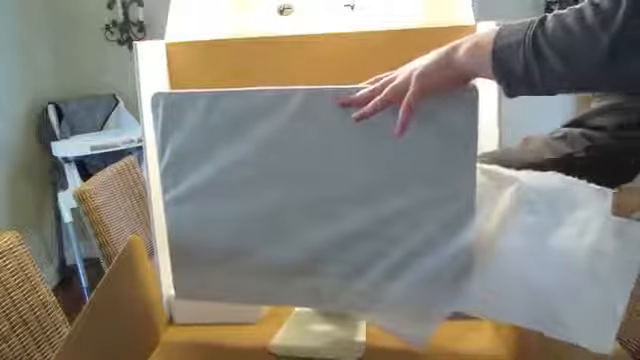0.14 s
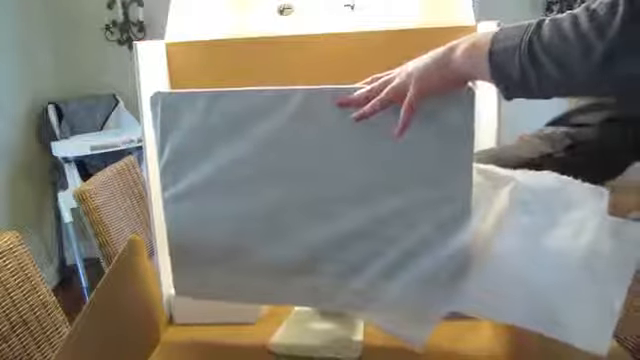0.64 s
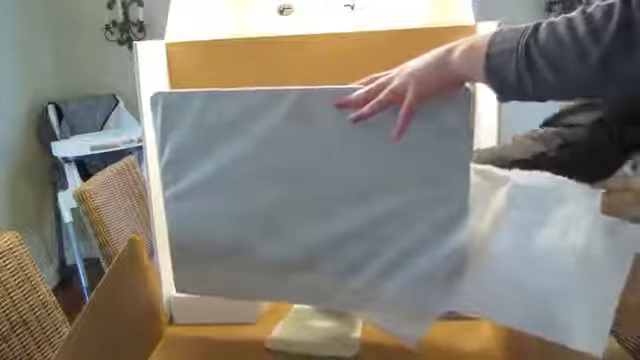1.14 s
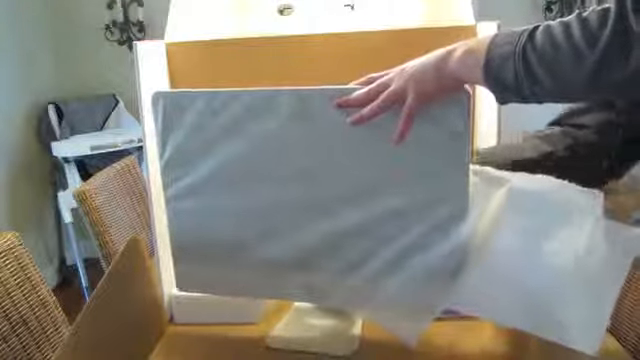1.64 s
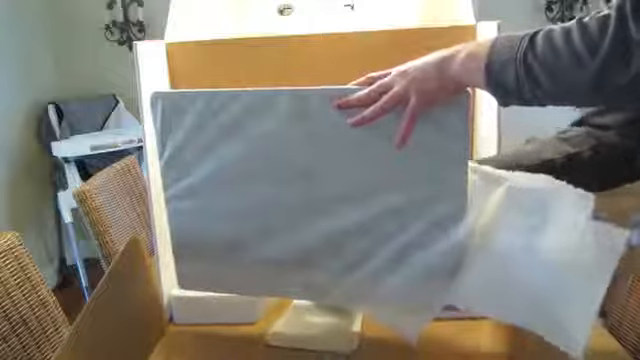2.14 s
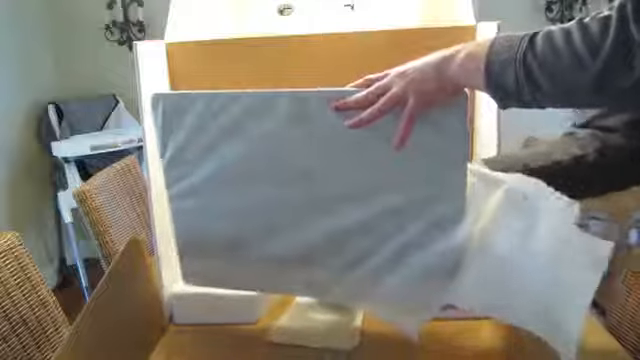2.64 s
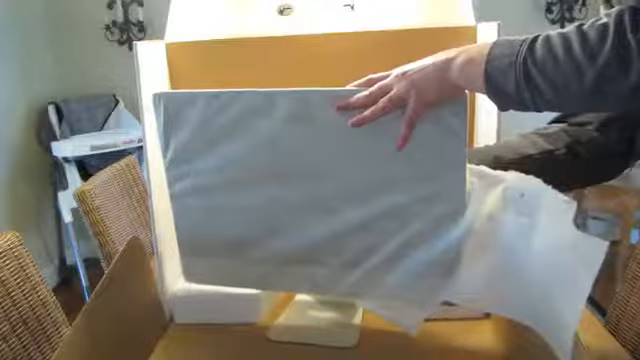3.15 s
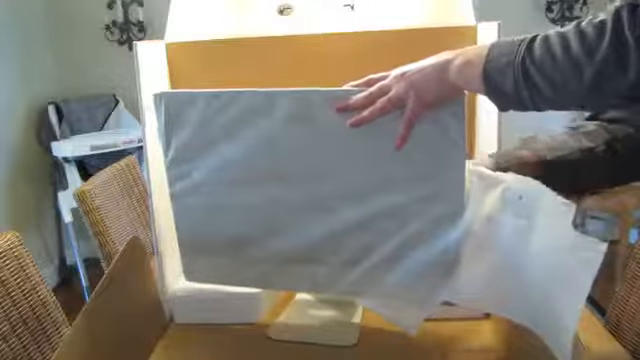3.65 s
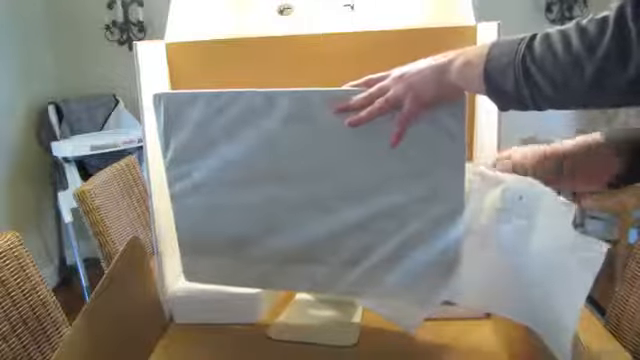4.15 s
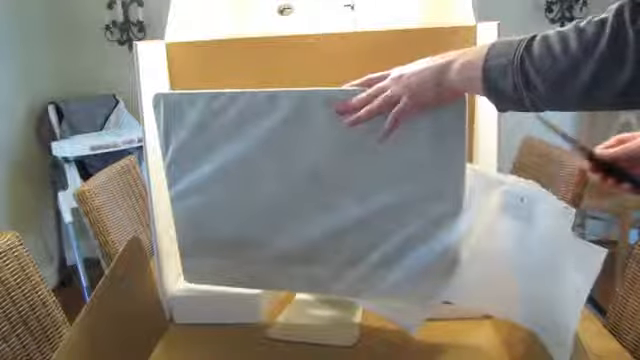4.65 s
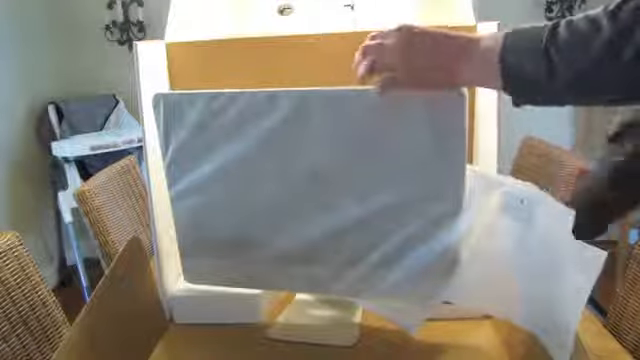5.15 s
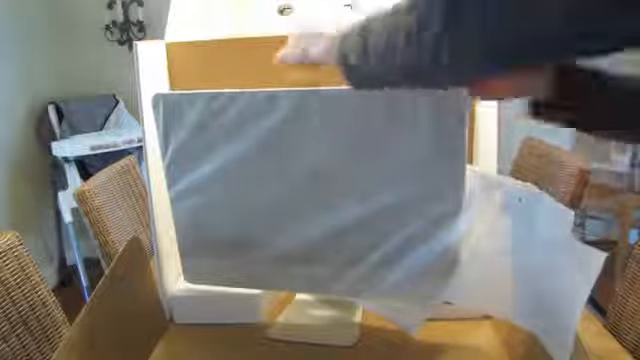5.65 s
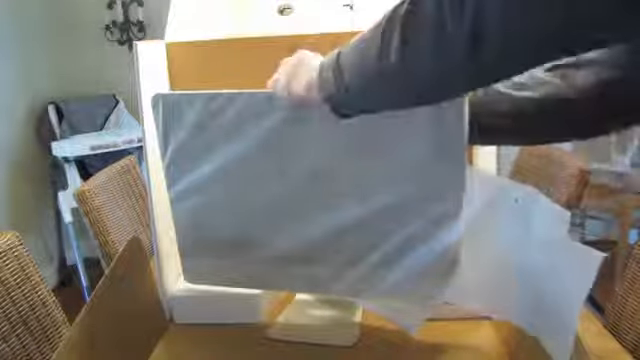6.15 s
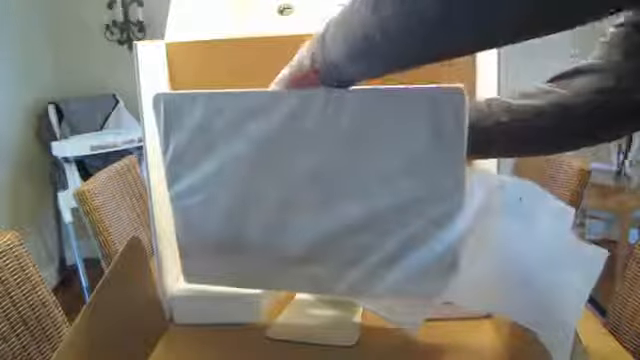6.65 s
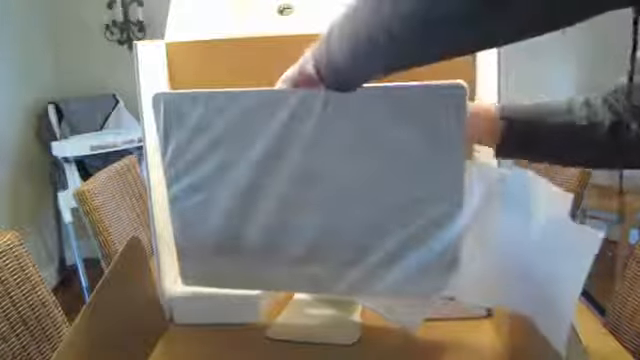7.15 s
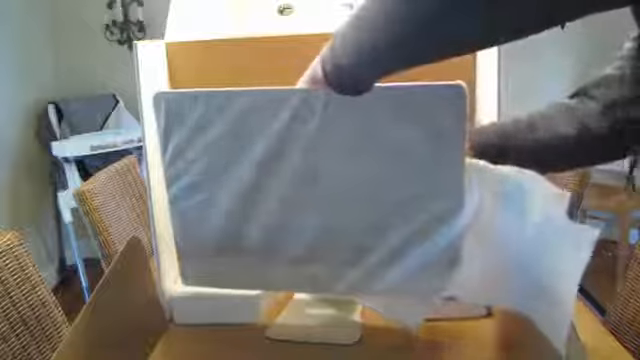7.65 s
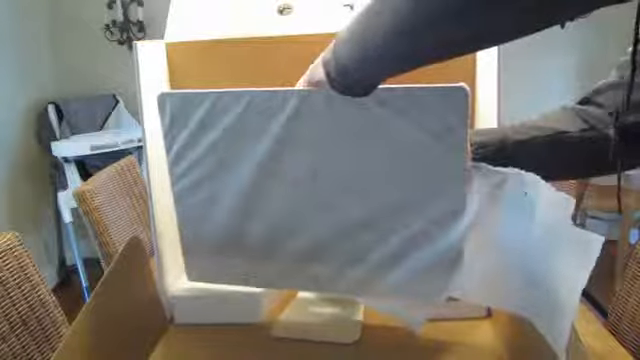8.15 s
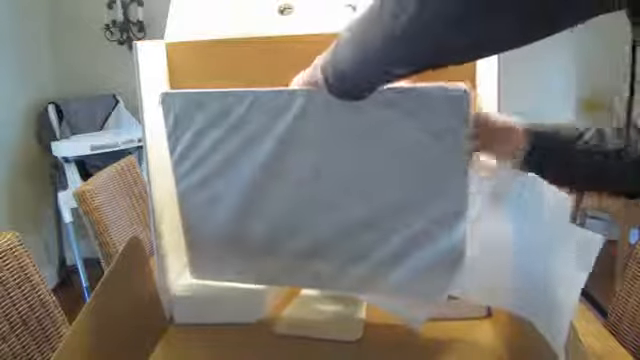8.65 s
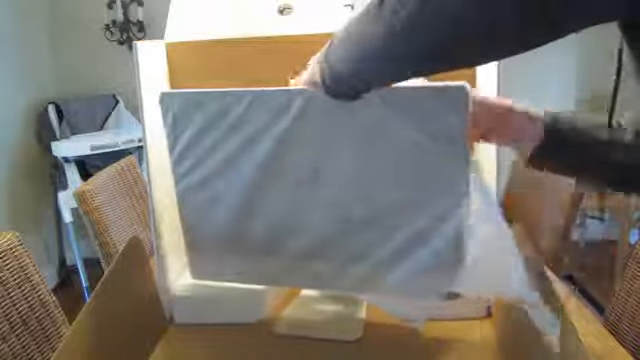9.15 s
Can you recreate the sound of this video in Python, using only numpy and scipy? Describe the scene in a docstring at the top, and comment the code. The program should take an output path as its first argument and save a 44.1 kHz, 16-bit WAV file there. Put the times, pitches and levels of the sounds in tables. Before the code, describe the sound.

A close small microphone in a modest living room hears thin foam and plastic sheeting dragged off a large panel. From 0 to 0.6 seconds, strong crackling tugs and sharp pops drum the panel underneath. Softer crinkles and isolated snaps follow, with brighter clusters around 1.7, 2.1 and 2.6, and a dense loud one at 3.5 to 3.7. From 3.8 to 4.45 a continuous rustling slide tightens and rises, with a faint thin squeak, ending in a pop. Near quiet follows. At 5.2 and 5.4 a foam block is knocked and shoved, dull then brighter and hollow. Faint rustles continue until snaps at 6.9 and 7.1, then light handling and a small pop at 7.9. From 8.4 to 8.9 loud snaps, crackles and panel thumps crowd together, fading by 9.3. Short room echoes, faint air hush and low table rumble lie beneath.

```python
"""Uncovering a large flat panel

Hands tug a thin foam and plastic cover off a large flat panel on a table in a living room.
Stick-slip friction makes the sheet crackle in strokes and drums the panel's low modes; creases snap
as clicks with short rattles; a foam block is knocked and shoved twice, ringing its own modes.
The room answers with echoes and a decaying tail; still air and the shaking table lie beneath,
and a small microphone dulls the treble."""
import sys
import numpy as np
from scipy import signal
from scipy.fft import rfft, irfft, next_fast_len
from scipy.io import wavfile
from scipy.ndimage import uniform_filter1d

SR = 44100
rng = np.random.default_rng(int(sys.argv[2]) if len(sys.argv) > 2 else 0)


def volts_from_db(level):
    """Convert decibel levels to linear amplitude ratios."""
    exponent = np.asarray(level, float) / 20
    return 10 ** exponent


def put_to_file(sound):
    """Save the sound as 16-bit audio at rate SR, in the file named by the first command-line argument."""
    columns = np.atleast_2d(sound).T  # one column per channel
    safe = np.clip(columns, -1, 1)
    whole_steps = np.round(safe * 32767)
    wavfile.write(sys.argv[1], SR, whole_steps.astype(np.int16))


N = 409688  # samples, 9.29 s


def evened(x):
    """Normalisation: scales a signal to rms 1."""
    return x / np.sqrt(np.mean(x ** 2) + 1e-20)


def read(points, hz):
    """Logarithmic pitch axis: interpolates a spectrum table over log frequency."""
    f, value = np.transpose(points)
    return np.interp(np.log(hz + 1), np.log(f + 1), value)


def curves(rows):
    """Piecewise-linear control: joins each column by straight lines, one value a sample."""
    s, *columns = np.transpose(rows)
    return [np.interp(np.arange(N) / SR, s, c) for c in columns]


def add(mix, s, sound):
    """Superposition: adds a sound into the mix at time s."""
    part = mix[round(s * SR):][:len(sound)]
    part += sound[:len(part)]


def coloured(x, points):
    """Linear filtering: weights the spectrum by a table, then scales to rms 1."""
    size = next_fast_len(len(x))
    gain = volts_from_db(read(points, np.fft.rfftfreq(size, 1 / SR)))
    return evened(irfft(rfft(x, size) * gain, size)[:len(x)])


def resonate(x, hz, width):
    """Heterodyne resonance: shifts hz down to zero, smooths and shifts back, with peak gain 1."""
    turn = np.exp(2j * np.pi * np.cumsum(hz * np.ones(len(x))) / SR)
    r = np.exp(-np.pi * abs(width) / SR)
    return 2 * (turn * signal.lfilter([1 - r], [1, -r], x / turn + 1e-18)).real


def slips(per_s, spread_db, clump_db):
    """Stick-slip friction: random tiny clicks of uneven size whose strength swells in clumps."""
    chance, size = rng.random(N), rng.exponential(1, N)
    sign, clump = rng.standard_normal(N), rng.standard_normal(N)
    clump = evened(uniform_filter1d(uniform_filter1d(clump, size=300), size=300))
    size_db = spread_db * np.minimum(size, 3.2) + clump_db * clump
    return evened((chance < per_s / SR) * sign * volts_from_db(size_db))


# Spectrum of the still air: (frequency [Hz], relative density [dB per Hz])
AIR_SPECTRUM = [(76, -35), (130, 3), (630, -5), (880, -6), (1600, -15), (1900, -9.5), (3800, -29),
                (7000, -26), (10000, -44), (14000, -37)]


def still_air():
    """Broadband noise: dense random clicks shaped into the hush of still room air."""
    return volts_from_db(-55) * coloured(slips(per_s=20000, spread_db=2.0, clump_db=2.0), AIR_SPECTRUM)


# Table and floor shaking the microphone:
# (time [s], slow sway level [dB], faster judder level before its trim [dB])
TABLE_SHAKE = [(0.0, -50, -66), (0.41, -38, -66), (0.93, -45, -54), (1.78, -42, -66), (1.81, -42, -56),
               (3.44, -45.5, -67), (4.17, -56.5, -67), (5.17, -50, -63), (5.22, -43, -60), (5.67, -46, -65),
               (6.6, -51.5, -60), (6.93, -34, -51), (7.06, -34, -60), (7.16, -47, -63), (7.35, -34.5, -56),
               (7.48, -44.5, -61), (7.99, -40, -54), (8.31, -47, -61), (8.57, -30, -50), (8.74, -33, -59),
               (8.87, -47, -44), (8.93, -32, -40), (9.0, -40, -58), (9.29, -53, -57)]
JUDDER_TRIM_DB = -1.5
JOLT_DB = -20  # share of the panel's drumming that reaches the table as judder


def table_shaking():
    """Structure-borne vibration: low noise sways the microphone and tugs on the panel jolt it."""
    sway_db, judder_db = curves(TABLE_SHAKE)
    # spectra: (frequency [Hz], relative density [dB per Hz])
    sway = coloured(rng.standard_normal(N), [(8, -12.5), (22, 7.0), (50, -9.5), (62, -13), (90, -57.5)])
    judder = coloured(rng.standard_normal(N), [(45, -26), (65, -7.5), (130, 3.5), (160, -5.5), (220, -25)])
    drag_db, _, drum_db, *_ = tugging()
    jolts = volts_from_db(judder_db + JUDDER_TRIM_DB) + volts_from_db(drag_db + drum_db + JOLT_DB)
    return volts_from_db(sway_db) * sway + jolts * judder


# Reverberation of the room: (frequency [Hz], time to decay by 60 dB [s])
REVERBERATION = [(120, 0.12), (330, 0.65), (870, 0.51), (2300, 0.34), (6060, 0.23)]


def room(x):
    """Reverberation: near echoes off table and panel, then sparse taps dying band by band."""
    out = np.zeros(N)
    # three answers fade in and out against each other: the paths shift as the hands move
    turn = 2 * np.pi * 4.75 * np.arange(N) / SR
    for k in range(3):
        taps = np.zeros(SR)
        at = np.arange(200, SR - 20, 20)
        taps[at + rng.integers(0, 20, len(at))] = rng.choice([-1., 1.], len(at))
        hz, t, z = signal.stft(taps, SR, nperseg=256)
        decay = volts_from_db(-60 * t / read(REVERBERATION, hz)[:, None])
        tail = signal.istft(z * decay, SR, nperseg=256)[1]
        tail = volts_from_db(-7.0) * tail / np.linalg.norm(tail)
        # echoes: (mean delay [s], level [dB])
        for s, db in [(.0021, -9), (.0047, -10), (.0088, -13), (.0135, -18)]:
            add(tail, s * rng.uniform(.7, 1.3), np.array([volts_from_db(db)]))
        sent = x * np.sqrt(2 / 3) * np.cos(turn + k * np.pi / 3)
        out += signal.fftconvolve(sent, tail)[:N]
    return out


# Modes of the foam block: (frequency [Hz], width [Hz], level before tilt [dB])
BLOCK_MODES = [(140, 100, -15), (267, 64, -9), (353, 38, 1), (468, 43, 0), (550, 175, -5.5), (723, 40, 5.5),
               (932, 52, 0.5), (1205, 130, -6.5), (1430, 59, -7), (1800, 150, -13.5), (2130, 110, -18),
               (2620, 710, -29.5)]
# Two shoves, one list each: (time [s], level before the trim [dB], tilt about 600 Hz [dB per octave])
BLOCK_SHOVES = [
    [(5.221, -25, -4), (5.229, -19.5, -4), (5.354, -36, -6.5)],
    [(5.357, -23.5, 3), (5.379, -17, 2.3), (5.555, -44, -3.5), (5.62, -61, 3)],
]
KNOCK_DB = 18  # first contact of each shove, above the rms of the slips
BLOCK_TRIM_DB = -4.5


def foam_block():
    """Modal excitation: a knock and coarse slips in each shove ring the modes of a foam block."""
    first, second = BLOCK_SHOVES
    level_db, tilt_db = curves(first + second)
    t = np.arange(N) / SR
    moving = (t > first[0][0]) & (t < second[-1][0])
    grains = slips(per_s=1800, spread_db=2.0, clump_db=0.9)
    for rows in BLOCK_SHOVES:
        add(grains, rows[0][0] + .001, np.array([volts_from_db(KNOCK_DB)]))
    shove = np.convolve(grains, np.hanning(17), "same")  # soft foam rounds each slip and dulls the top
    rung = np.zeros(N)
    for k, (hz, width, db) in enumerate(BLOCK_MODES):
        gain = (-1) ** k * volts_from_db(db + tilt_db * np.log2(hz / 600))
        rung += gain * resonate(shove, hz, width)
    rms = np.sqrt(np.mean(rung[moving] ** 2))
    return moving * volts_from_db(level_db + BLOCK_TRIM_DB) * rung / rms


# Spectrum of the sheet's body: (frequency [Hz], relative density [dB per Hz])
SHEET_SPECTRUM = [(180, -43), (300, -12), (592, -11), (1010, 4), (1100, -1), (1430, 1), (2500, 1.5),
                  (2830, 0), (4500, -16.5), (5850, -22.5), (9900, -120)]


def sheet_body(clicks):
    """Radiation of a thin sheet: clicks take on its broad spectrum, at rms 1."""
    return coloured(clicks, SHEET_SPECTRUM)


# Spectrum of the fine crackle: (frequency [Hz], relative density [dB per Hz])
CRACKLE_SPECTRUM = [(1800, -20), (3000, -10.5), (3800, -8), (5300, -5), (7500, -8), (8700, -13),
                    (10000, -18), (14000, -18.5)]


def fine_crackle(clicks):
    """Small-fold radiation: clicks take on a bright spectrum, at rms 1."""
    return coloured(clicks, CRACKLE_SPECTRUM)


# How the steadying hand loads the panel: (time [s], tilt of its modes about 240 Hz [dB per octave])
HAND_GRIP = [(0, -5.5), (1, 3.5), (2.2, -5.5), (3.6, -4.5), (4.2, 6), (5.7, 4.5), (6.8, -5), (7.3, 5.5),
             (8.4, 5), (9.29, 7.5)]


def grip_tilt():
    """Loading of a plate: the hand's grip tilts the balance of the panel's modes."""
    return curves(HAND_GRIP)[0]


# Modes of the panel: (frequency [Hz], nominal width [Hz], level before tilt [dB])
PANEL_MODES = [(178.5, 42, -2.5), (230, 55, 7), (326.5, 75, 3), (404, 143, -3.5), (614, 298, -7)]


def panel(force, tilt_db):
    """Modal sum: a force rings steep resonances of alternating sign."""
    out = 0
    for k, (hz, width, db) in enumerate(PANEL_MODES):
        gain = (-1) ** k * volts_from_db(db + tilt_db * np.log2(hz / 240))
        # each of two passes is widened, since passing twice narrows the peak
        once = resonate(force, hz, 1.48 * width)
        out = out + gain * resonate(once, hz, 1.48 * width)
    return out


# Creases that snap, and at 5.224 s the sharp tick of the foam block's first knock: (time [s], level before the
# trim [dB], pitch of the pop [Hz], # thump relative to the pop, before its trim [dB], crack relative to the
# pop, before its boost [dB])
SNAPS = [(0.028, -27, 2460, -1, -18), (0.052, -6, 2550, -15.5, -13), (0.216, -24, 2620, -3, 1),
         (0.236, -5.5, 710, -5, -15), (0.253, -10, 1120, -8.5, -18), (0.272, -13, 2600, -4, -18),
         (0.444, -17, 1750, -11, -4), (0.485, -11.5, 3040, -13, -17), (0.97, -22, 1000, -14, -27),
         (1.165, -19.5, 840, 3, -3.5), (1.346, -16.5, 2400, -31, -28), (1.37, -17, 2300, -25, -25),
         (1.533, -28.5, 1290, 5.5, -3), (1.725, -10, 1940, -35, -15), (1.746, -7.5, 2400, -23, -29),
         (1.817, -12, 2710, -28, -9.5), (1.942, -22.5, 2800, -8, -9), (2.135, -2.5, 2260, -31, -24),
         (2.155, -5, 2320, -29, -36), (2.17, -9, 2190, -33, -31), (2.428, -19, 1290, -2, -10),
         (2.578, -10.5, 1640, -16, -37), (2.617, -7, 2410, -36, -19), (2.947, -15, 2290, -5.5, -15),
         (3.114, -22.5, 985, -7, -16), (3.257, -28.5, 2400, -28, -2.5), (3.278, -25, 1990, -42, -2.5),
         (3.465, -21, 2500, -21, -25), (3.486, -6, 2380, -39, -31), (3.507, -5, 1080, -28, -19),
         (3.535, 0, 2340, -26, -41), (3.577, -5.5, 2280, -15, -15), (3.598, -5.5, 2600, -40, -16),
         (3.612, -9.5, 1810, -26, -19), (3.711, -8.5, 2200, -20.5, -14), (4.316, -21.5, 2640, -50, -3.5),
         (4.463, -9.5, 1030, -2.5, -23), (5.224, -26.5, 692, 7, -8.5), (5.671, -42, 834, -14, 2.5),
         (5.764, -31, 885, -3, -13), (6.065, -47, 1130, -18, 2), (6.11, -49, 2500, -20, -3),
         (6.18, -48, 2500, -20, 2), (6.295, -35.5, 1360, -16, -15), (6.393, -40, 2370, -24, -5),
         (6.553, -33, 2900, -17, -15), (6.805, -33, 1940, 14, -20), (6.875, -28, 2000, 6, 4),
         (6.907, -13, 1950, -32, -33), (7.024, -22, 1150, -29, -10), (7.113, -13.5, 970, -25, -32),
         (7.141, -4, 1360, -30, -9), (7.314, -27.5, 1000, -23, -28), (7.483, -33, 1420, 4.5, -15),
         (7.596, -30, 2090, 2, -13), (7.869, -19.5, 1360, -35, -9), (8.437, -2, 1400, -14.5, -14),
         (8.469, -2.5, 1240, -17.5, -17.5), (8.563, -10, 1920, -6.5, -10.5), (8.639, -19, 864, -12, -4),
         (8.689, -3.5, 1430, -16, -35), (8.703, -2, 1520, -30, -17), (8.8, -3, 1440, -8.5, -20),
         (8.822, -3, 2020, -16, -25), (8.856, -4, 990, -4, -6.5), (8.909, -11, 643, -4, -8)]
RATTLE_S, SHORTENING = 0.0046, 0.18  # decay time at a table level of -10 dB; dB shorter per dB louder
SNAP_TRIM_DB, CRACK_BOOST_DB, THUMP_TRIM_DB = -4.5, 6.0, -0.4


def snaps():
    """Impulsive release: each crease, and the tick of the block's first knock, gives a pitched pop, a bright
    crack and a thump in the panel."""
    out, t = np.zeros(N), np.arange(3000) / SR
    tilt_db = grip_tilt()
    for s, db, hz, thump_db, crack_db in SNAPS:
        click = 2.0 * np.exp(-t / 0.0022)
        rattle = np.exp(-t / (RATTLE_S * volts_from_db(-SHORTENING * (db + 10))))
        fade = click + rattle + 0.25 * np.exp(-t / 0.063)
        burst = rng.standard_normal(len(t)) * fade * np.minimum(t / 0.00045, 1)
        pitched = resonate(resonate(burst, hz, .24 * hz), hz, 1.5 * hz)
        pop = pitched + 0.13 * sheet_body(burst) * burst.std()
        crack = fine_crackle(burst)
        thump = panel(np.exp(-t / 0.00084), tilt_db[round(s * SR)])
        snap = pop / abs(pop).max()
        snap += volts_from_db(crack_db + CRACK_BOOST_DB) * crack / abs(crack).max()
        snap += volts_from_db(thump_db + THUMP_TRIM_DB) * thump / abs(thump).max()
        add(out, s - .001, volts_from_db(db + SNAP_TRIM_DB) * snap)
    return out


def sticking():
    """Static friction: the drag dips ahead of a loud snap, as the sheet holds before letting go."""
    change_db, ramp = np.zeros(N), np.exp(np.arange(-1000, 0) / SR / 0.011)
    for s, db, *_ in SNAPS:
        # a louder snap follows a firmer hold; below -26 dB the drag swells instead
        add(change_db, s - .001 - len(ramp) / SR, -.35 * (db + 26) * ramp)
    return change_db


# Short tugs at the sheet: (peak time [s], drag level before the trim [dB], build-up [s],
# pitch of the sheet [Hz], drumming of the panel relative to the drag [dB])
SHEET_TUGS = [(0.058, -25, 0.056, 2600, -6.5), (0.238, -16.5, 0.049, 1600, -0.5),
              (0.451, -20.5, 0.021, 2330, -12), (0.489, -23, 0.047, 1940, -1), (0.622, -27, .1, 1810, -6.5),
              (0.969, -38.5, 0.21, 1600, -6), (1.11, -34, 0.11, 1800, -7), (1.17, -36.5, 0.032, 1400, 6.5),
              (1.362, -28.5, 0.091, 2280, -11), (1.53, -31, 0.047, 1470, 0), (1.579, -28.5, 0.14, 1570, -2),
              (1.732, -23, 0.03, 2260, -17), (1.785, -28.5, 0.095, 2300, -11),
              (1.82, -33.5, .03, 2270, -13), (1.961, -33.5, 0.12, 2100, 1), (2.0, -38.5, 0.1, 1460, 6),
              (2.144, -16.5, 0.028, 2150, -13), (2.23, -32.5, 0.26, 1680, -7),
              (2.428, -24.5, 0.16, 1330, -0.5), (2.592, -28, 0.022, 1860, -7),
              (2.629, -19, 0.099, 1880, -13), (2.87, -26, 0.094, 1150, -3.5),
              (2.92, -32.5, 0.084, 1200, 4.5), (3.05, -41, 0.27, 1130, 2.5),
              (3.138, -30.5, 0.041, 1650, -4.5), (3.27, -37, .08, 1880, -2.5), (3.35, -40, 0.083, 1500, -8),
              (3.509, -18.5, 0.073, 1770, -23), (3.546, -21, 0.016, 1900, -24),
              (3.6, -21, 0.066, 2100, -14), (3.711, -28, 0.09, 1800, -22),
              (4.468, -29.5, 0.046, 1540, -4.5), (4.96, -58, .08, 2500, -8), (5.7, -47.5, 0.066, 1060, 8),
              (5.8, -51, .15, 1100, 7.5), (6.07, -60, 0.17, 1110, -9), (6.3, -53.5, .1, 1400, 1),
              (6.4, -55.5, 0.16, 2100, -12), (6.59, -45.5, 0.093, 2000, 2), (6.72, -47, .1, 2000, 0),
              (6.789, -40.5, 0.045, 2400, -1), (6.88, -26.5, 0.0065, 1900, -8), (6.91, -28, .04, 1930, -13),
              (7.026, -35, 0.014, 1470, -17), (7.07, -37, .1, 1400, -10), (7.142, -25, 0.038, 1400, 1),
              (7.19, -29.5, 0.073, 1320, -2), (7.66, -54, .08, 1500, 1), (7.76, -64, 0.056, 2600, -12),
              (7.879, -38, 0.093, 1540, -8), (8.44, -18, 0.01, 1430, -17), (8.5, -29, 0.064, 1430, -4),
              (8.57, -26, .035, 1690, -16), (8.64, -32, 0.044, 1370, 5.5), (8.698, -21, 0.08, 1530, -4),
              (8.77, -43, 0.086, 1500, -9), (8.805, -26, 0.013, 1530, -4), (8.828, -21.5, .015, 1700, 3.5),
              (8.862, -24, .015, 1490, 4), (8.94, -31.5, .15, 1400, -6), (9.23, -50.5, .1, 2000, 0.5)]
# The sheet between the tugs, with one long slide near the middle: (time [s],
# rustle level before the trim [dB], crispness [dB], pitch [Hz], tautness [0-1])
SHEET_HANDLING = [(0, -43, -5, 2000, .15), (.82, -69, -5.5, 1500, 0.02), (1.2, -62, -5, 1500, 0.07),
                  (1.75, -50.5, -9, 1800, 0.02), (2.4, -56, -9.5, 1600, 0.09),
                  (3.4, -67.5, -5.5, 1590, 0.12), (3.62, -51, -17.5, 1800, 0), (3.8, -40, -9.5, 1880, 0),
                  (4.0, -37, -4, 1940, 0.24), (4.19, -38, -2.5, 2270, 0.7), (4.34, -37, -0.5, 2600, 0.85),
                  (4.45, -40.5, 1.5, 2330, 0.5), (4.52, -52, -21, 1400, 0.2), (4.73, -67.5, 1, 1310, 0.1),
                  (5.6, -56.5, -18, 1200, 0.54), (6.0, -60, 0, 1300, 0.44), (6.5, -61.5, -2, 1590, 0),
                  (6.62, -54, -5.5, 1600, 0.01), (7.15, -50, 1, 1500, 0.44), (7.5, -50.5, -6.5, 1500, 0),
                  (8.05, -50.5, -6, 1700, 0.2), (8.25, -65.5, 2, 1500, .3), (8.42, -48, -9, 1440, 0.15),
                  (8.55, -44, -12, 1500, 0.73), (8.8, -44, -10, 1500, 0.3), (9.05, -47.5, -6, 1230, 0.24),
                  (9.29, -55.5, -4, 1400, 0.03)]
BUILD_DB, RELEASE_DB_PER_S = 24, 211  # rise over one build-up time; fall after the peak
PANEL_LEAD = 1.22  # the panel's longer build-up
CRACKLE_LEAD, CRACKLE_RELEASE_DB_PER_S = 1.13, 230  # fine crackle starts earlier and stops sooner
DULLING = 0.15  # dB of crispness lost per dB of harder drag
IDLE_DRUM_DB, IDLE_DRUM_TOP_DB = -6, -53  # the panel under the rustle: relative level and its ceiling


def tugging():
    """Power summation: tugs swell and release over the rustle, and the strongest weighs most in pitch."""
    rustle_db, crisp_db, rustle_hz, taut = curves(SHEET_HANDLING)
    t = np.arange(N) / SR
    power = volts_from_db(rustle_db) ** 2
    weighted_pitch, fine = power * rustle_hz, power.copy()
    drum = volts_from_db(np.minimum(rustle_db + IDLE_DRUM_DB, IDLE_DRUM_TOP_DB)) ** 2
    for s, db, build, hz, drum_db in SHEET_TUGS:
        near = slice(max(round((s - .5) * SR), 0), round((s + .5) * SR))
        rise_db = BUILD_DB * np.maximum(s - t[near], 0) / max(build, .003)
        late = np.maximum(t[near] - s, 0)
        fall_db = RELEASE_DB_PER_S * late
        tug = volts_from_db(db - rise_db - fall_db) ** 2
        power[near] += tug
        weighted_pitch[near] += tug * hz
        fine_db = db - DULLING * (db + 34)
        fine[near] += volts_from_db(fine_db - rise_db / CRACKLE_LEAD - CRACKLE_RELEASE_DB_PER_S * late) ** 2
        drum[near] += volts_from_db(db + drum_db - rise_db / PANEL_LEAD - fall_db) ** 2
    drag_db = 10 * np.log10(power)
    crisp_db = crisp_db + 10 * np.log10(fine / power)
    return drag_db, crisp_db, 10 * np.log10(drum / power), weighted_pitch / power, taut


def ticks():
    """Random impulses: stray small creases under the hands, each a click with a short rattle."""
    t = np.arange(1000) / SR
    rattle = rng.standard_normal(len(t)) * (np.exp(-t / 0.0012) + 0.55 * np.exp(-t / .006))
    clicks = signal.oaconvolve(slips(per_s=70, spread_db=0.5, clump_db=-0.5), rattle)[:N]
    return volts_from_db(-15) * (sheet_body(clicks) + 0.99 * fine_crackle(clicks))


# A thin squeak late in the long slide: (time [s], level [dB])
SQUEAK_LEVEL = [(4.1, -72), (4.19, -53), (4.33, -45), (4.45, -54), (4.47, -95)]


def squeak(clicks):
    """Narrow resonance: the slips of the sheet ring a thin tone at 4520 Hz."""
    return volts_from_db(curves(SQUEAK_LEVEL)[0]) * evened(resonate(clicks, 4520, 180))


def drag():
    """Stick-slip excitation: slips ring the taut sheet, crackle on top and drum the panel."""
    drag_db, crisp_db, drum_db, hz, taut = tugging()
    taut = np.clip(taut, 0, 1)
    clicks = slips(per_s=6000, spread_db=2.5, clump_db=1.1)
    ring = evened(resonate(resonate(clicks, hz, 1150), hz, 1150))
    body = np.sqrt(1 - taut) * sheet_body(clicks) + np.sqrt(taut) * ring
    crackle = fine_crackle(clicks + 0.48 * slips(per_s=4900, spread_db=1.5, clump_db=2.0))
    drum = evened(panel(slips(per_s=820, spread_db=5.0, clump_db=-0.5), grip_tilt()))
    layers = body + volts_from_db(crisp_db) * crackle + volts_from_db(drum_db) * drum + ticks()
    trim_db = -4.0
    return volts_from_db(drag_db + trim_db + sticking()) * layers + squeak(clicks)


def scene():
    """Superposition: cover, panel and block with the room's answer, over air and table."""
    near = drag() + snaps() + foam_block()
    return (near + room(near) + still_air() + table_shaking())[None]


# Response of the small microphone: (frequency [Hz], gain [dB])
MICROPHONE_RESPONSE = [(9500, -0.5), (10800, -8), (11600, -22), (12300, -11), (14300, -13.5), (15000, -28),
                       (15300, -53), (15900, -36), (17000, -57)]


def microphone(sound):
    """Frequency response: the small microphone dulls the top and has a notch there."""
    gain = volts_from_db(read(MICROPHONE_RESPONSE, np.fft.rfftfreq(N, 1 / SR)))
    return irfft(rfft(sound) * gain, N)


def low_pass(x):
    """Removes everything above the highest recorded frequency."""
    return signal.sosfilt(signal.butter(12, 16280, fs=SR, output="sos"), x)


def record(dry):
    """Transduction: the microphone turns the finished scene into the recorded signal."""
    mix = microphone(dry)
    return low_pass(mix)


dry = scene()
out = record(dry)
put_to_file(out)
```